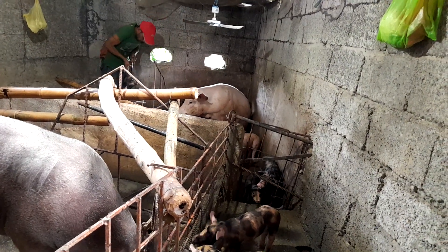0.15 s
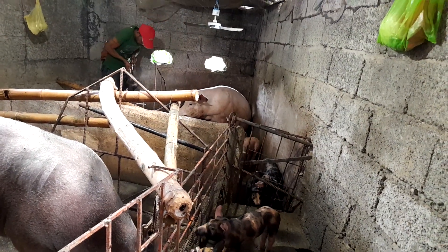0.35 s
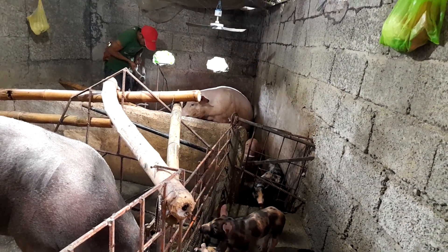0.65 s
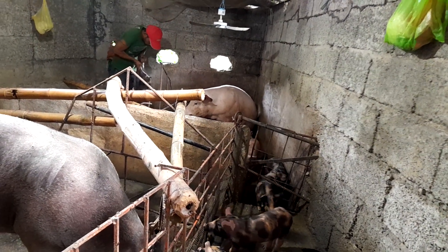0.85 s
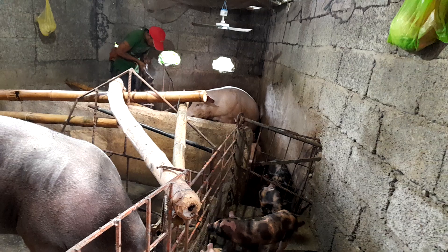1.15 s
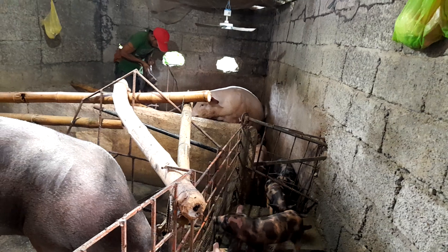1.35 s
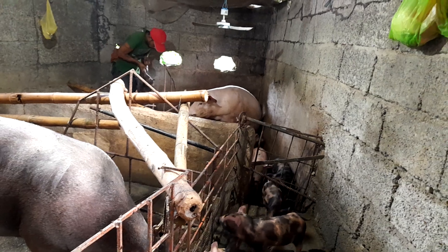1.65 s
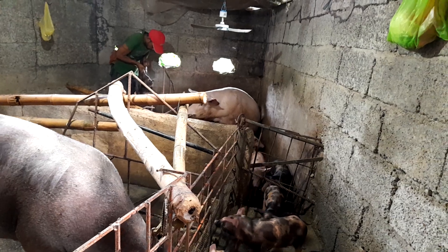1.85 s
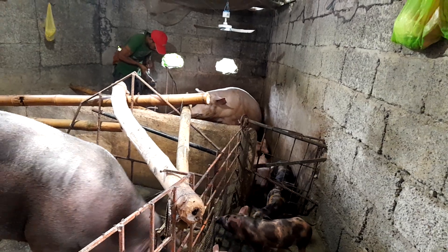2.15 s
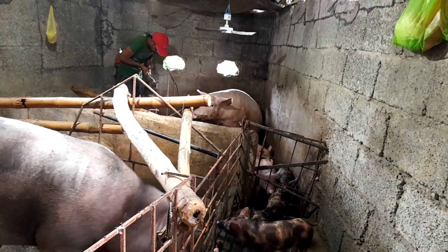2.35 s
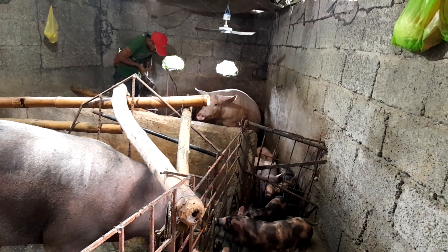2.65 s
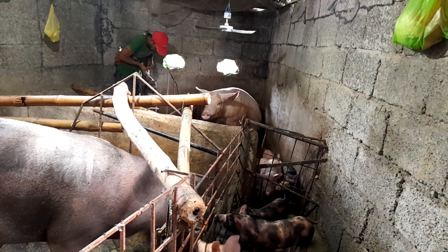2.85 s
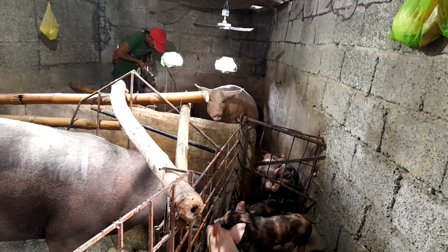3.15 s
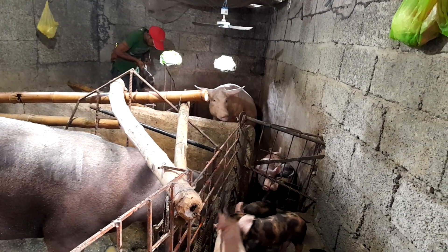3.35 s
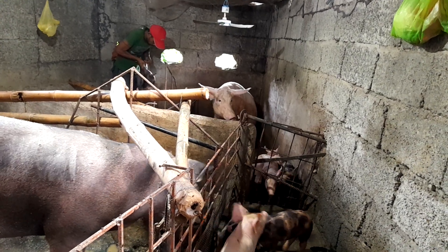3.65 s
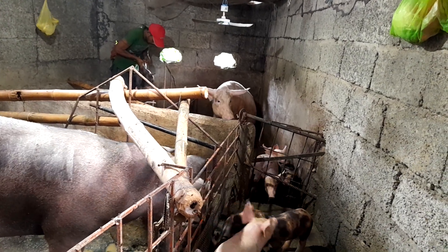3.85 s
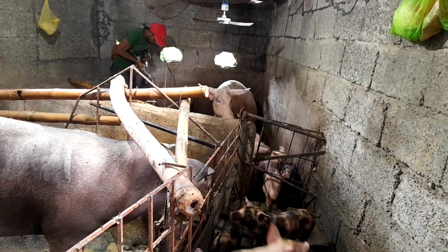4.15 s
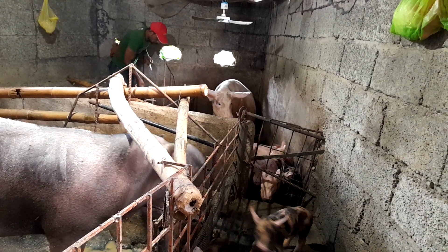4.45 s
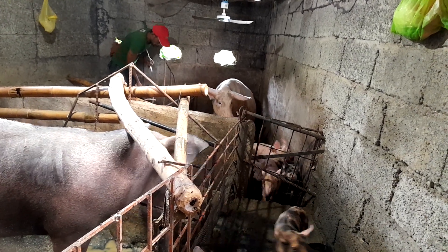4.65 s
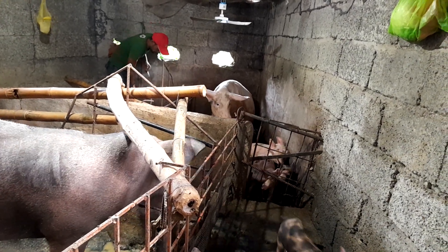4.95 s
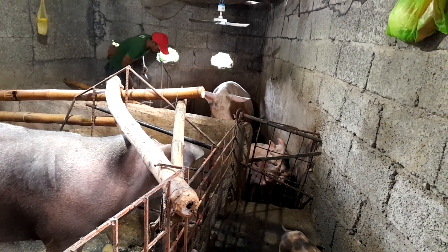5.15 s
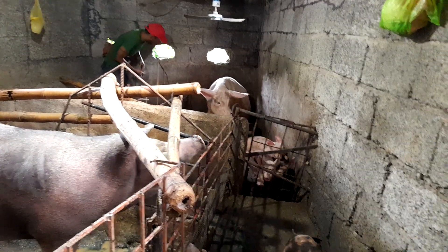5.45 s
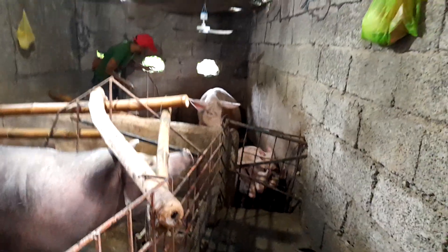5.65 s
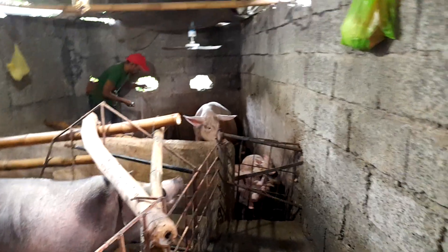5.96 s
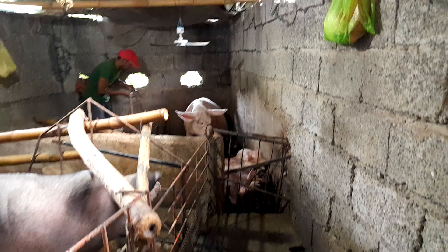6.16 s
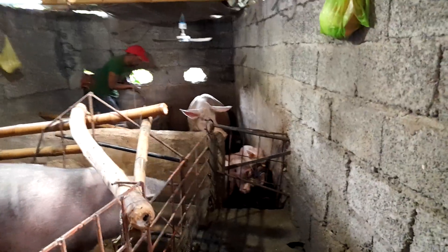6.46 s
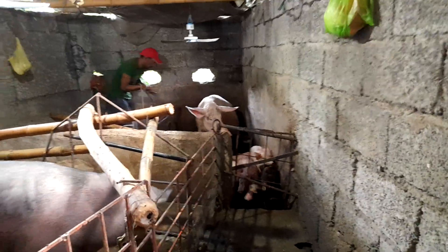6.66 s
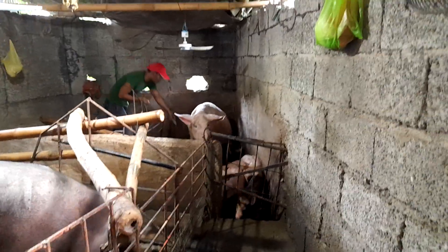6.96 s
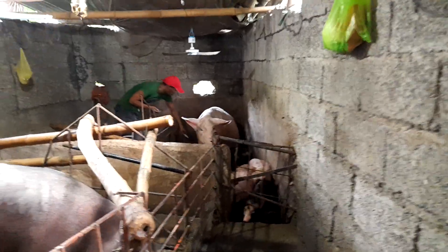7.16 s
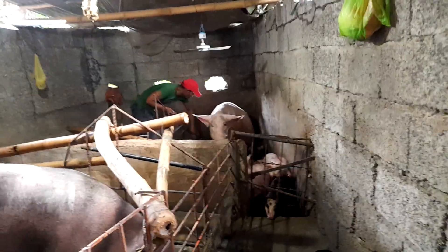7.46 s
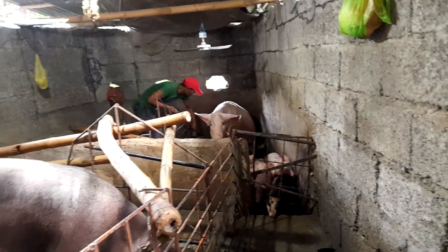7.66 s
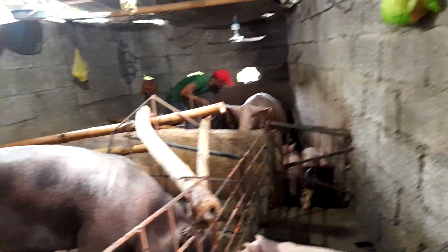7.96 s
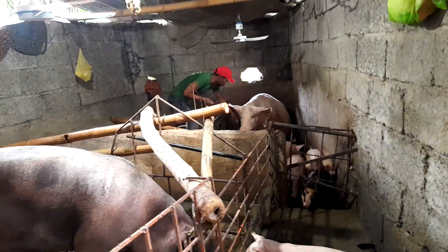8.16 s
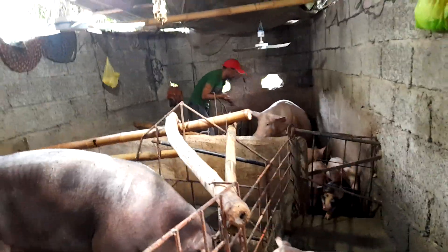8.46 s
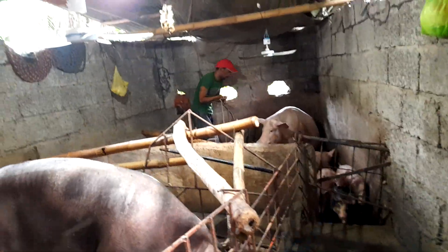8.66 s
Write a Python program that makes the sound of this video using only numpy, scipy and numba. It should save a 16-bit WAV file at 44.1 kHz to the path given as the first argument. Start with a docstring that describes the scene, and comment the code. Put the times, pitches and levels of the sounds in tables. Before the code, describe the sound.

In a bare concrete-block pen, a piglet gives short hoarse yelps over a sow's low fluttering grunts, then a wobbling whistle-like squeak and two long, loud, tearing squeals. Afterwards the sow grunts in quick short pulses, with hoarse snorts, creaky croaks, hoof and bar knocks and faint shuffling. The stereo microphone hears close animals with short, hard wall ring.

```python
"""A concrete-block pen with pigs: bare walls ring short and hard over a faint rumble and floor shuffling.
A piglet yelps, whistles and breaks into two long squeals, built from vocal-fold pulses and throat whistles.
A sow's slow fold flaps grunt from the start; hoarse snorts, creaky croaks and small nasal grunts join in.
Hooves and bars knock as bursts of ringing noise, and two dry ticks fall close to the microphone.
The microphone has two ports: direct sound reaches the left first, and the treble echoes differ."""
import sys
import numpy as np
from scipy import signal
from scipy.fft import rfft, irfft, next_fast_len
from scipy.io import wavfile
from scipy.ndimage import uniform_filter1d
from numba import njit

SR = 44100
rng = np.random.default_rng(int(sys.argv[2]) if len(sys.argv) > 2 else 0)


def transcribe(u):
    """Save the signal u as a 16-bit wav file named by the first command-line argument.

    u: samples, shape (n,) or (channels, n), limited to [-1, 1]; the rate is SR.
    q: integer samples, one column per channel.
    """
    v = np.clip(np.atleast_2d(u).T, -1, 1)
    q = np.round(v * 32767).astype(np.int16)
    wavfile.write(sys.argv[1], SR, q)


N = 388962
TIME = np.arange(N) / SR  # seconds

# rumble of the shed: (frequency [Hz], level [dB])
AIR_SPECTRUM = [(18, -86.5), (30, -21), (88, -6.5), (160, -5), (399, -15), (492, -15), (606, -13.5),
                (1020, -25.5), (15500, -41.5)]
AIR_LEVEL_DB = -51
# shuffling on the floor: (time [s], level [dB])
SHUFFLE_LEVEL = [(0, -46), (1.6, -47), (2.3, -37), (3.3, -66.5), (5.4, -60.5), (6, -45), (7.5, -49.5),
                 (8.3, -42), (8.8, -49.5)]
# standing waves of the pen, heard on the sow's chest sound: (frequency [Hz], width [Hz], level [dB])
PEN_MODES = [(63.4, 13, -5.5), (168.4, 8.4, 9.5)]
# balance of the microphone ports: (frequency [Hz], left minus right [dB])
PORT_BALANCE = [(60, -1.5), (200, -1.1), (700, 0), (1290, 2), (2380, -12), (4400, -9), (8120, -4),
                (15000, 0)]
TOP_HZ = 15600

# knocks of hooves and bars, and one sharp flap of a croak (at 7.023 s):
# (time [s], starting level [dB], ring [Hz], 60 dB decay [s])
KNOCKS_AND_FLAP = [(0.448, -26.5, 2100, 0.042), (4.495, -28, 3380, 0.031), (4.792, -28, 4820, 0.03),
                   (5.784, -14.5, 3700, 0.014), (6.48, -33.5, 3600, 0.1), (6.481, -28, 810, 0.05),
                   (7.023, -32, 3230, .019), (6.774, -23.5, 3770, 0.01), (8.04, -28, 3480, 0.022),
                   (8.097, -22, 3500, 0.022), (8.692, -18.5, 4180, 0.034)]
# dry ticks close to the microphone: (time [s], gain on a tap of peak 0.24 [dB])
TICKS = [(5.9268, 6), (5.996, -3.5)]

# creaky croaks of a smaller pig:
# (time [s], length [s], flap rate [1/s], throat level [dB], snout rasp level [dB])
CROAKS = [(5.69, 0.1, 44.4, -35, -43), (6.999, 0.054, 46, -32, -29), (7.756, 0.086, 56.5, -31.5, -42),
          (8.524, 0.11, 41, -40.5, -43.5)]
# throat and snout resonances of the croaks, each: (mid-croak frequency [Hz], width [Hz], level [dB])
CROAK_THROAT = [(316, 124, -0.5), (610, 220, -7)]
CROAK_SNOUT = [(1950, 1200, -11), (3030, 1730, 0)]
CROAK_SNAP_S = 0.0021  # decay of each flap
CROAK_EDGE_DB, CROAK_RISE_SHARE = -5.5, 0.047  # weaker ends; rise of the resonances

# hoarse snorts, and the nasal rings of small grunts and croaks (at 5.492, 7.814 and 8.532 s):
# (time [s], length [s], level [dB], main resonance [Hz], second resonance [Hz])
SNORTS_AND_NASAL_RINGS = [(4.349, 0.091, -30.5, 2410, 4020), (4.581, 0.1, -23, 1940, 3310),
                          (4.798, 0.11, -31, 2260, 3300), (5.025, 0.085, -39.5, 2490, 4000),
                          (5.492, 0.062, -38, 2580, 1850), (7.814, 0.032, -27, 2600, 1840),
                          (8.532, 0.069, -36, 2700, 2000)]
# their breathy, rattling colour: (frequency [Hz], level [dB])
HOARSE_THROAT = [(50, -35), (200, 2), (500, -7), (1150, -6), (1650, -13), (2200, -5), (3600, -10),
                 (5500, -12.5), (14000, -36.5)]
HOARSE_RING_DB, HOARSE_SECOND_RING_DB, HOARSE_WIDTH_HZ = -3.5, -6, 710
HOARSE_RISE_SHARE = .12

# sow's grunts: (time [s], length [s], chest level [dB], snout rasp level [dB],
# mid-grunt throat resonance [Hz], throat level [dB])
GRUNTS = [(.235, .1, -39, -71, 444, -39.5), (.762, .12, -33, -46, 415, -41),
          (.895, .18, -27.5, -48, 384, -41), (1.735, .11, -38, -38, 464, -38.5),
          (1.954, .13, -25.5, -26, 350, -28.5), (4.391, .07, -31.5, -49, 392, -47),
          (4.479, .065, -34, -40.5, 524, -40.5), (4.775, .09, -41, -39, 472, -42),
          (5.038, .07, -34, -45.5, 440, -43), (5.443, .12, -40.5, -45, 338, -39.5),
          (5.745, .08, -32, -31, 352, -33), (5.829, .105, -30, -41.5, 443, -35.5),
          (5.972, .11, -29.5, -40, 465, -33), (6.194, .11, -30.5, -42, 400, -37.5),
          (6.589, .085, -35, -44, 447, -37.5), (6.9, .1, -32, -35.5, 432, -36),
          (7.04, .08, -36.5, -51, 354, -44), (7.206, .16, -30, -41, 430, -34),
          (7.576, .12, -33.5, -44.5, 420, -35), (7.815, .12, -31, -37.5, 428, -34.5),
          (8.013, .17, -27, -38.5, 430, -32), (8.237, .09, -33, -44, 550, -38.5),
          (8.525, .11, -41.5, -57, 530, -42), (8.66, .12, -27, -36.5, 420, -33)]
# deep boom of the sow's one open-mouthed bark: (time [s], length [s], level [dB])
BOOM = (1.92, 0.3, -38.5)
# chest and snout of the sow, each: (frequency [Hz], level [dB])
SOW_CHEST = [(30, -42.5), (65, -8.5), (90, -6.5), (125, 7), (175, 3), (240, 1), (330, -5.5), (450, -11.5),
             (720, -20), (1300, -27), (2200, -75)]
SOW_SNOUT = [(100, -37), (700, 10), (1200, -4.5), (1550, 0), (1900, -1.5), (2250, -0.5), (3000, 15),
             (3500, 3), (4200, 7.5), (5000, -4), (8000, -12.5), (14000, -41)]
GRUNT_PEAK_SHARE = .3  # place of the peak in a grunt, snort or nasal ring
FLAP_HZ, FLAP_SAG_SHARE = 56.6, .25  # the folds slow through a grunt
CHEST_LAG_S = 0.009  # the chest swells after the mouth
THROAT_ARCH_SHARE, THROAT_FALL_SHARE, THROAT_WIDTH_HZ = .13, .1, 150
SNOUT_RING = .35  # gain

# yelps: (time [s], length [s], place of the peak [0-1], pitch at 0.7 of the way to the peak [Hz],
# level before the lift below [dB], throat re level [dB], treble re level [dB],
# nominal whistling resonance [Hz], whistle re level [dB], nominal mouth resonance [Hz])
YELPS = [(0.03, 0.12, 0.77, 430.5, -35.5, -3, 5, 2406, 6, 2580),
         (0.295, 0.099, 0.66, 421.3, -32, -3.5, 0.5, 4290, 4, 2470),
         (0.556, 0.095, 0.94, 478.7, -28, -7.5, 2, 3970, -3.5, 2660),
         (0.841, 0.099, 0.5, 423.9, -33.5, -3, 4, 4124, 5.5, 2300),
         (1.145, 0.23, 0.21, 397.1, -37.5, -5, 0.5, 3990, 0, 2480),
         (1.231, 0.17, 0.7, 409.5, -38, -8, 9.5, 5010, 10.5, 2480),
         (1.367, 0.14, 0.53, 479.5, -27.5, -7, 6, 4910, 5, 2510),
         (2.248, 0.098, 0.166, 485.7, -11.5, -24, -8.5, 2687, -11.5, 2703)]
YELP_LIFT_DB = 3.5
# treble resonances of the yelps: (nominal frequency [Hz], width [Hz], level [dB])
YELP_TREBLE = [(3850, 620, 7), (6400, 1070, 11), (14080, 2200, 4)]
YELP_MOUTH_WIDTH_HZ, YELP_WANDER_DB, YELP_GRAIN_DB = 1000, .5, 2.5
YELP_SCOOP_SHARE, YELP_SWEEP_SHARE, YELP_FALL_SHARE = .2, .36, .07

# whistled squeals: (time [s], length [s], pitch [Hz], sag [share of pitch], base level [dB],
# crescendo [dB]); the level runs from base minus two crescendos to base minus one
WHISTLES = [(1.239, 0.056, 1390, .12, -37.5, 1), (1.31, 0.086, 2800, 0.011, -19, 0),
            (1.331, 0.046, 2570, .1, -25.5, 3), (1.677, 0.023, 1123, 0.0085, -41, -7),
            (4.825, 0.056, 2245, 0.019, -44.5, 17)]
WHISTLE_EDGE_S = 0.015
SCOOP_SHARE, SCOOP_S = 0.23, 0.022  # slide up into the pitch, shorter in brief whistles
WHISTLE_DROP_SHARE, WHISTLE_DROP_S = 0.17, 0.0094  # drop as it gives out

# pitch of the long squeak before the squeals: (time [s], pitch [Hz])
SQUEAK_PITCH = [(1.705, 2050), (1.725, 2520), (1.75, 2860), (1.78, 3030), (1.8, 2790), (1.835, 2650),
                (1.872, 2790), (1.897, 2570), (1.945, 2780), (1.965, 2640), (1.985, 2350)]
# effort of the squeak: (time [s], level [dB])
SQUEAK_LEVEL = [(1.7, -36), (1.725, -27.5), (1.77, -22), (1.8, -15.5), (1.84, -22.5), (1.9, -19),
                (1.96, -18), (1.99, -38)]
# partials of the squeak: (multiple of the pitch, relative level [dB])
SQUEAK_OVERTONES = [(1, -5.5), (2, -17), (4, -33.5), (5, -19.5)]
# folds and breath join in towards its end
SQUEAK_CHOP_HZ, SQUEAK_CHOP_DEPTH, SQUEAK_BREATH_DB = 619, 0.95, -5.5

# long squeals: (time [s], length [s], level at the end before push and release [dB], crescendo [dB],
# last push [dB], base treble re body [dB], treble change [dB], muffling by the half-shut mouth [dB]);
# the treble runs from base minus 1.5 changes to base minus half a change
SQUEALS = [(2.474, 0.83, -16.3, -0.5, 3.5, -5.5, -1.5, -9.5),
           (3.536, 0.683, -17.5, 6.5, 10.5, -5.5, -2.5, -3.5)]
SQUEAL_ATTACK_S, SQUEAL_ATTACK_DB = 0.022, 3
SQUEAL_RELEASE_S, SQUEAL_RELEASE_DB = 0.02, 18
PUSH_BEFORE_END_S, PUSH_S, PUSH_TREBLE_DB = 0.021, 0.055, -3  # a last effort
MOUTH_OPENS_S, SHUT_TREBLE_DB = 0.027, -5
# treble flare at the height of the first scream: (time [s], spread [s], level [dB])
TREBLE_FLARE = (2.65, .05, 7)
# pitch of the folds in the first and second squeal, each: (time [s], pitch [Hz])
FIRST_PITCH = [(2.47, 620), (2.58, 720), (2.645, 860), (2.71, 820), (2.79, 690), (2.89, 680), (2.95, 650),
               (3.02, 638), (3.1, 627), (3.28, 620)]
SECOND_PITCH = [(3.69, 553.8), (3.89, 558), (3.946, 569), (4.05, 558), (4.135, 564), (4.165, 630),
                (4.2, 710)]
DRIFT_SHARE = .003  # slow wander of that pitch
# folds start rough, lock and break up again: (time [s], roughness [0-1])
ROUGHNESS = [(2.55, .85), (2.58, .35), (2.64, .6), (2.71, .5), (2.785, .8), (2.805, .08), (2.88, .15),
             (2.95, .36), (3.08, .17), (3.15, .34), (3.21, .1), (3.27, .12), (3.29, .85), (3.62, .85),
             (3.69, .2), (3.74, .04), (3.93, .1), (4.05, .05), (4.115, .1), (4.15, .4), (4.195, .35),
             (4.21, .85)]
HOARSE_BREATH = .7
# throat of the squeals: (frequency [Hz], level [dB])
SQUEAL_THROAT = [(300, -66), (560, -29.5), (860, -8), (1150, -19.5), (1700, -14.5), (2200, -6),
                 (2800, -4.5), (3450, 3.5), (4500, -3), (5400, -3), (6100, 5), (6900, -5.5), (8300, -11.5),
                 (9500, -22.5), (11500, -11.5), (14300, -10), (16000, -27.5)]
# mouth resonance: (time [s], frequency [Hz])
MOUTH = [(2.47, 930), (2.51, 1620), (2.55, 2780), (2.6, 3400), (2.67, 3860), (2.76, 3130), (3.29, 2600),
         (3.53, 950), (3.595, 1760), (3.63, 3520), (3.8, 3220), (4.0, 2630), (4.22, 2630)]
MOUTH_WIDTH_HZ, MOUTH_DB, MOUTH_ROUGH_DB = 550, -8, 5.5  # rings more as the voice roughens
# throat whistle beside the folds, through the first squeal and at both ends of the second,
# each: (time [s], pitch [Hz], share of the power [0-1])
FIRST_WHISTLE = [(2.47, 1750, .25), (2.51, 2450, .15), (2.56, 2850, .5), (2.6, 2900, .7), (2.69, 2820, .45),
                 (2.76, 2480, .6), (2.8, 2690, .8), (2.87, 2730, .9), (2.93, 2870, .92), (3.0, 2800, .9),
                 (3.03, 2865, .93), (3.12, 2790, .92), (3.27, 2830, .93), (3.287, 2480, .8),
                 (3.32, 2380, .8)]
SECOND_WHISTLE = [(3.53, 1900, .4), (3.58, 1900, .2), (3.62, 1900, 0), (4.135, 2810, 0), (4.16, 2820, .75),
                  (4.2, 2860, .8), (4.215, 2500, .6), (4.24, 2400, .6)]
# partials of that whistle: (multiple of the pitch, level [dB])
WHISTLE_OVERTONES = [(1, 10.5), (2, -6), (3, -14), (4, -12), (5, -19)]
# throat colour on the whistle and its side tones: (frequency [Hz], level [dB])
WHISTLE_THROAT = [(900, -20), (1550, -12), (2200, -3.5), (2830, 3), (3450, 4), (4200, 6), (5000, -0.5),
                  (5600, 14), (6300, 13.5), (8400, 1.5), (13000, 12)]
CHOP_DEPTH = 2.3  # how hard smooth folds chop it


def undb(db):
    """Decibels to gain."""
    return 10 ** (np.asarray(db) / 20)


def unit(x):
    """Scale to rms 1."""
    return x / np.sqrt(np.mean(x ** 2))


def steady(x):
    """Hold the short-time level at 1."""
    return x / np.sqrt(uniform_filter1d(x ** 2, size=1200) + 1e-12)


def noise():
    """White noise for the whole scene."""
    return rng.standard_normal(N)


def walk(rate):
    """Smooth random wander with a spread near 1, turning up to `rate` times a second."""
    knots = np.arange(N // 4) / rate
    return 1.2 * np.interp(TIME, knots, rng.standard_normal(len(knots)))


def curves(rows):
    """Each column of a table as a line through time."""
    s, *columns = np.transpose(rows)
    return [np.interp(TIME, s, column) for column in columns]


def stroke(s, length, peak_share):
    """Progress 0-1 through a call and its swell, which peaks at the given share of the length."""
    progress = np.clip((TIME - s) / length, 0, 1)
    peak = np.clip(peak_share, .1, .9)
    return progress, np.sin(np.interp(progress, [0, peak, 1], [0, np.pi / 2, np.pi]))


def colour(x, points):
    """Filter by a spectrum of (frequency [Hz], level [dB]) points."""
    hz, db = np.transpose(points)
    length = x.shape[-1]
    size = next_fast_len(length + 4096)
    bins = np.maximum(np.fft.rfftfreq(size, 1 / SR), 1)
    gain = undb(np.interp(np.log(bins), np.log(hz), db))
    return irfft(rfft(x, size) * gain, size)[..., :length]


@njit
def svf(x, g, k):
    """State-variable band-pass whose centre may move."""
    y, band, low = np.empty(len(x)), 0., 0.
    for i in range(len(x)):
        v = (band + g[i] * (x[i] + 1e-18 - low)) / (1 + g[i] * (g[i] + k[i]))
        band, low, y[i] = 2 * v - band, low + 2 * g[i] * v, k[i] * v
    return y


def resonance(x, hz, width):
    """A steep resonance: the band-pass applied twice."""
    hz = np.minimum(hz, .45 * SR) * np.ones(len(x))
    g, k = np.tan(np.pi * hz / SR), width / hz
    return svf(svf(x, g, k), g, k)


def folds(hz, jitter, shimmer_db, breath):
    """Vocal folds: a pulse per uneven cycle, and turbulent air let through once a cycle."""
    phase = np.cumsum(hz * (1 + jitter * walk(np.mean(hz) / 2))) / SR
    at = np.interp(np.arange(1, int(phase[-1])), phase, np.arange(N))
    # windowed sinc places each pulse between samples
    taps = at.astype(int)[:, None] + np.arange(-7, 9)
    offset = taps - at[:, None]
    shape = np.sinc(offset) * np.cos(np.pi * offset / 16) ** 2
    size = undb(shimmer_db * noise())[at.astype(int), None]
    pulses = np.bincount(np.clip(taps, 0, N - 1).ravel(), (size * shape).ravel(), N)
    turbulence = noise() * np.exp(-2 * (phase % 1))
    breath = np.clip(breath, 0, 1)
    return np.sqrt(1 - breath ** 2) * unit(pulses - pulses.mean()) + breath * unit(turbulence)


def ports(pair):
    """Diffuse sound at two close ports: alike in the bass, unrelated in the treble."""
    side = colour(pair[1], [(100, -20.5), (250, -13.5), (500, -11.0), (1000, 0.0)])
    return np.array([pair[0] + side, pair[0] - side]) / np.sqrt(2)


def pen(x, wet_db, lag_samples, t60=0.38, treble_t60=0.25):
    """Direct sound, reaching the left port first, and the dense ring of the block walls."""
    age = np.arange(int(.7 * SR)) / SR
    scatter = ports(rng.standard_normal((2, len(age))))
    low = colour(scatter, [(3000, -5.5), (12000, -73)])
    tail = low * undb(-60 * age / t60) + (scatter - low) * undb(-60 * age / treble_t60)
    tail = tail * (age > .003)
    response = undb(wet_db) * unit(tail) / np.sqrt(len(age))
    response[0, 0] += 1
    response[1] += np.sinc(age * SR - lag_samples)
    # keep the total power of direct sound and ring
    return signal.fftconvolve(x[None], response, axes=1)[:, :N] / np.sqrt(1 + undb(2 * wet_db))


def air():
    """Faint rumble of the shed as coloured noise, and gritty, uneven noise shuffling on its floor."""
    rumble = unit(colour(ports([noise(), noise()]), AIR_SPECTRUM))
    grit = noise() * undb(9.1 * walk(300) + walk(20))
    grit_spectrum = [(500, -21.5), (3000, -7.5), (9000, -21.0), (14500, -18.5), (15500, -42.5)]
    shuffle = pen(unit(colour(grit, grit_spectrum)), wet_db=23.0, lag_samples=1.4)
    shuffle_db, = curves(SHUFFLE_LEVEL)
    return rumble * undb(AIR_LEVEL_DB + 2 * walk(23)) + shuffle * undb(shuffle_db)


def knocks_and_flap():
    """Each blow, and one sharp croak flap, is a burst of dying noise around a ring."""
    out = np.zeros(N)
    age = np.arange(SR // 4) / SR
    for s, db, hz, t60 in KNOCKS_AND_FLAP:
        width = hz * min(hz / 4500, .8)
        ring = unit(resonance(rng.standard_normal(len(age)), hz, width))
        start = int(s * SR)
        out[start:start + len(age)] += (undb(db - 60 * age / t60) * ring)[:N - start]
    return out


def ticks():
    """Tiny hard taps: two damped tones that die within two milliseconds."""
    out = np.zeros(N)
    age = np.arange(256) / SR
    tones = 0.13 * np.cos(2 * np.pi * 4500 * age) + 0.11 * np.cos(2 * np.pi * 1400 * age)
    tap = np.exp(-age / 0.00022) * tones
    for s, db in TICKS:
        start = int(s * SR)
        out[start:start + len(age)] += undb(db) * tap
    return out


def croak_ring(source, rings, rise):
    """Resonances of one cavity, rising together, set ringing by the same flaps."""
    return unit(sum(undb(db) * unit(resonance(source, hz * rise, width)) for hz, width, db in rings))


def croaks():
    """Separate flaps of slack folds ring throat and snout; the resonances rise as the mouth opens."""
    out = np.zeros(N)
    breath = noise()
    for s, length, flap_hz, db, rasp_db in CROAKS:
        during = (TIME >= s) & (TIME < s + length)
        age = TIME[during] - s
        progress = age / length
        flaps = np.exp(-(age % (1 / flap_hz)) / CROAK_SNAP_S)
        flaps = flaps * undb(CROAK_EDGE_DB * (2 * progress - 1) ** 2)
        rise = 1 + CROAK_RISE_SHARE * (progress - .5)
        throat = croak_ring(flaps * (1 + breath[during]), CROAK_THROAT, rise)
        snout = croak_ring(flaps * breath[during], CROAK_SNOUT, rise)
        out[during] += undb(db) * throat + undb(rasp_db) * snout
    return out


def snorts_and_nasal_rings():
    """Rattling, breathy pulses drive two rising resonances: of a snort, or the nose in a small call."""
    out = np.zeros(N)
    source = folds(np.full(N, 125), .2, 4, .45)
    rattle = colour(source, HOARSE_THROAT)
    for s, length, db, ring_hz, second_hz in SNORTS_AND_NASAL_RINGS:
        progress, swell = stroke(s, length, GRUNT_PEAK_SHARE)
        during = (progress > 0) & (progress < 1)
        x = source[during]
        rise = 1 + HOARSE_RISE_SHARE * (progress[during] - GRUNT_PEAK_SHARE)
        first = undb(HOARSE_RING_DB) * unit(resonance(x, ring_hz * rise, HOARSE_WIDTH_HZ))
        second = undb(HOARSE_SECOND_RING_DB) * unit(resonance(x, second_hz * rise, HOARSE_WIDTH_HZ))
        out[during] += undb(db) * swell[during] ** 2 * unit(unit(rattle[during]) + first + second)
    return out


def sow():
    """Slow flaps of the folds ring throat and chest and rasp in the snout; pitch sags in each grunt."""
    effort, chest_effort, rasp, sag = np.zeros((4, N))
    throat_hz = np.full(N, float(GRUNTS[0][4]))
    for s, length, chest_db, rasp_db, hz, throat_db in GRUNTS:
        progress, swell = stroke(s, length, GRUNT_PEAK_SHARE)
        begun = progress > 0
        effort += undb(throat_db) * swell
        chest_effort += undb(chest_db) * stroke(s + CHEST_LAG_S, length, 0.54)[1]
        rasp += undb(rasp_db) * swell
        throat_hz[begun] = hz
        sag[begun] = progress[begun] - .5  # -0.5 at the start of a grunt, 0.5 at its end
    source = folds(FLAP_HZ * (1 - FLAP_SAG_SHARE * sag) * undb(1.2 * walk(4)), .15, 2, .35)
    chest = unit(colour(source, SOW_CHEST))
    modes = sum(undb(db) * resonance(chest, hz, width) for hz, width, db in PEN_MODES)
    chest = steady(chest + modes)
    throat_hz = throat_hz * (1 - THROAT_ARCH_SHARE * (2 * sag) ** 2 - THROAT_FALL_SHARE * sag)
    throat = steady(resonance(source, throat_hz, THROAT_WIDTH_HZ))
    wet_air = source + .25 * noise()
    mouth = undb(-19) * unit(resonance(wet_air, 1180 * (1 - .2 * sag), 450))
    snout_ring = unit(resonance(wet_air, 2900 * undb(2.5 * walk(11)), 420))
    snout = unit(colour(wet_air, SOW_SNOUT)) + SNOUT_RING * snout_ring
    boom_s, boom_length, boom_db = BOOM
    boom_swell = stroke(boom_s, boom_length, 0.25)[1]
    boom = undb(boom_db) * boom_swell * unit(resonance(wet_air, 64, 24))
    return chest_effort * chest + effort * (throat + mouth) + rasp * snout + boom


def yelps():
    """Short voiced cries: throat first, then pitch and resonances sweep up as the mouth snaps open."""
    out = np.zeros(N)
    pitch = np.ones(N)  # practically at rest before the first yelp
    for s, length, peak_share, hz, *_ in YELPS:
        progress = stroke(s, length, peak_share)[0]
        begun = progress > 0
        scoop = np.minimum(progress[begun], peak_share) - .7 * peak_share
        pitch[begun] = hz * (1 + YELP_SCOOP_SHARE * scoop)
    source = folds(pitch * (1 + .04 * walk(60)), .035, 3.5, .45) * undb(YELP_GRAIN_DB * walk(180))
    mouth_wander = undb(YELP_WANDER_DB * walk(70))
    treble_wander = [undb(YELP_WANDER_DB * walk(70)) for _ in YELP_TREBLE]
    waver = 1 + .04 * walk(900) + .025 * walk(90)
    for (s, length, peak_share, hz, db, throat_db, treble_db,
         ring_hz, ring_db, mouth_hz) in YELPS:
        progress, swell = stroke(s, length, peak_share)
        during = (progress > 0) & (progress < 1)
        x, swell, progress = source[during], swell[during], progress[during]
        # resonances sweep up towards the peak and sink a little at the end
        rise = YELP_SWEEP_SHARE * np.exp(-(progress / (.7 * peak_share)) ** 2)
        sweep = 1.04 - rise - YELP_FALL_SHARE * progress ** 4
        throat = unit(resonance(x, 1300 * sweep, 600)) + undb(-2.0) * unit(resonance(x, hz, 170))
        mouth = unit(resonance(x, mouth_hz * sweep * mouth_wander[during], YELP_MOUTH_WIDTH_HZ))
        treble = unit(sum(undb(gain_db) * resonance(x, f * sweep * wander[during], width)
                          for (f, width, gain_db), wander in zip(YELP_TREBLE, treble_wander)))
        ring_phase = 2 * np.pi * np.cumsum(ring_hz * sweep ** .3 * waver[during]) / SR
        ring = np.sqrt(2) * np.sin(ring_phase)
        open_mouth = mouth + undb(treble_db) * treble + undb(ring_db) * ring
        cry = swell * undb(throat_db) * throat + swell ** 3.04 * open_mouth
        out[during] += undb(db + YELP_LIFT_DB) * cry
    return out


def whistles(waver=0.0064, overtone_db=-11):
    """Brief throat whistles that scoop up to a pitch, wobble and sag, and drop as they give out."""
    gain, pitch = np.zeros(N), np.zeros(N)
    for s, length, hz, sag, db, crescendo_db in WHISTLES:
        during = (TIME >= s) & (TIME < s + length)
        age = TIME[during] - s
        left, progress = length - age, age / length
        edges = np.minimum(np.minimum(age, left) / WHISTLE_EDGE_S, 1)
        gain[during] = undb(db - crescendo_db * (2 - progress)) * edges
        scoop = SCOOP_SHARE * np.exp(-age / min(SCOOP_S, length / 6))
        drop = WHISTLE_DROP_SHARE * np.exp(-left / WHISTLE_DROP_S)
        pitch[during] = hz * (1 - scoop - sag * progress - drop)
    phase = 2 * np.pi * np.cumsum(pitch * (1 + waver * walk(350) + .022 * walk(70))) / SR
    tone = np.sqrt(2) * (np.sin(phase) + undb(overtone_db) * np.sin(2 * phase))
    flutter = undb(2.2 * walk(90))
    return tone * flutter * gain


def squeak():
    """A long throat whistle that arches up, wobbles, and frays as the folds begin to chop it."""
    start, end = SQUEAK_PITCH[0][0], SQUEAK_PITCH[-1][0]
    progress, swell = stroke(start, end - start, 0.75)
    fray = progress ** 3
    hz = curves(SQUEAK_PITCH)[0] * (1 + .011 * walk(140) + (.005 + .022 * fray) * walk(700))
    phase = 2 * np.pi * np.cumsum(hz) / SR
    tone = sum(undb(db) * np.sin(k * phase) for k, db in SQUEAK_OVERTONES)
    chop_phase = 2 * np.pi * np.cumsum(SQUEAK_CHOP_HZ * (1 + 0.019 * walk(90))) / SR
    chop = np.exp(SQUEAK_CHOP_DEPTH * fray * np.cos(chop_phase))
    breath = undb(SQUEAK_BREATH_DB) * fray * unit(colour(noise(), SQUEAL_THROAT))
    flutter = undb(2.5 * walk(110))
    level = undb(curves(SQUEAK_LEVEL)[0]) * np.minimum(10 * swell, 1)
    return (steady(tone * chop) * flutter + breath) * level


def squeal_controls():
    """Body gain, treble gain, throat opening and gate: swell, last push and the mouth snapping open."""
    out = np.zeros((4, N))
    flare_s, flare_spread, flare_db = TREBLE_FLARE
    for s, length, db, crescendo_db, push_db, treble_db, treble_change_db, shut_db in SQUEALS:
        during = (TIME >= s) & (TIME < s + length)
        age = TIME[during] - s
        left, progress = length - age, age / length
        push = np.exp(-((left - PUSH_BEFORE_END_S) / PUSH_S) ** 2)
        shut = np.exp(-(age / MOUTH_OPENS_S) ** 2)
        flare = np.exp(-((TIME[during] - flare_s) / flare_spread) ** 2)
        attack_db = SQUEAL_ATTACK_DB * np.exp(-age / SQUEAL_ATTACK_S)
        release_db = SQUEAL_RELEASE_DB * np.exp(-left / SQUEAL_RELEASE_S)
        swell_db = db + crescendo_db * (progress - 1.0)
        body = undb(swell_db + push_db * push + shut_db * shut - attack_db - release_db)
        tilt_db = treble_db + treble_change_db * (progress - 1.5)
        treble = body * undb(tilt_db + SHUT_TREBLE_DB * shut + PUSH_TREBLE_DB * push + flare_db * flare)
        out[:, during] = body, treble, 1 - .85 * shut, np.ones(len(age))
    return out


def chopped_whistle(hz, fold_hz, rough):
    """The folds chop the throat whistle once a cycle, setting side tones around it and its overtones."""
    tearing = (.002 + .03 * rough ** 2) * walk(130) + .04 * rough ** 4 * walk(700)
    phase = 2 * np.pi * np.cumsum(hz * (1 + tearing)) / SR
    tone = sum(undb(db) * np.sin(k * phase) for k, db in WHISTLE_OVERTONES)
    fold_phase = 2 * np.pi * np.cumsum(fold_hz) / SR
    chop = np.exp(CHOP_DEPTH * (1 - rough ** 2) * np.cos(fold_phase))
    return unit(colour(tone * chop, WHISTLE_THROAT))


def squeals():
    """Each starts hoarse behind a half-shut mouth, locks onto a pitch and ends in a falling whistle."""
    body_gain, treble_gain, opening, gate = squeal_controls()
    rough, = curves(ROUGHNESS)
    whistle_hz, share = curves(FIRST_WHISTLE + SECOND_WHISTLE)
    # rough folds stagger in pitch and leak air; locked folds give clean lines
    wander = DRIFT_SHARE * walk(30) + (.001 + .05 * rough ** 2) * walk(110)
    hz = curves(FIRST_PITCH + SECOND_PITCH)[0] * (1 + wander)
    source = folds(hz, .025 * rough, 3 * rough, HOARSE_BREATH * rough ** 2)
    throat = unit(colour(source, SQUEAL_THROAT)) * opening
    mouth = steady(resonance(source, curves(MOUTH)[0], MOUTH_WIDTH_HZ))
    voice = steady(throat + undb(MOUTH_DB + MOUTH_ROUGH_DB * rough) * mouth)
    whistle = chopped_whistle(whistle_hz, hz, rough)
    voice = np.sqrt(1 - share) * voice + np.sqrt(share) * whistle
    body = colour(voice, [(3550, 0), (3850, -40)])
    flutter = undb(3.47 * walk(45))
    return gate * (steady(body) * body_gain * flutter + steady(voice - body) * treble_gain)


def scene():
    """All the animals in one pen, each group with its own share of wall ring and lag between ports."""
    background = air() + ticks()
    others = knocks_and_flap() + croaks() + snorts_and_nasal_rings()
    others = pen(others, wet_db=5.5, lag_samples=3.65)
    grunts = pen(sow(), wet_db=3.0, lag_samples=7.7)
    cries = pen(yelps() + whistles() + squeak(), wet_db=3.5, lag_samples=2.7)
    screams = pen(squeals(), wet_db=5.5, lag_samples=3.5)
    return background + others + grunts + cries + screams


def record(dry):
    """The left port is weaker in the upper mids and treble; peaks are rounded and the top is cut."""
    hz, db = np.transpose(PORT_BALANCE)
    power_db = 10 * np.log10((undb(db) + undb(-db)) / 2)  # keeps the summed power of both ports
    left = colour(dry[0], np.transpose([hz, db / 2 - power_db]))
    right = colour(dry[1], np.transpose([hz, -db / 2 - power_db]))
    top_cut = signal.ellip(10, .2, 80, TOP_HZ, fs=SR, output="sos")
    return signal.sosfilt(top_cut, np.tanh([left, right]))


dry = scene()
out = record(dry)
transcribe(out)
```